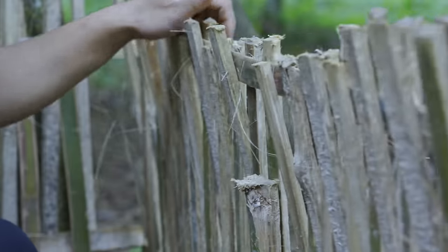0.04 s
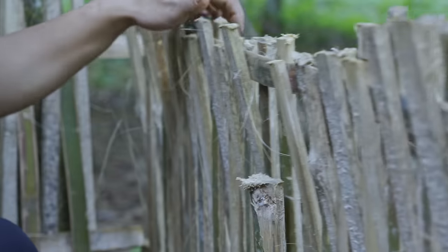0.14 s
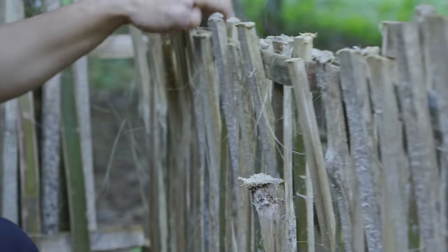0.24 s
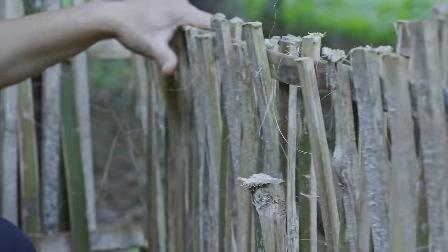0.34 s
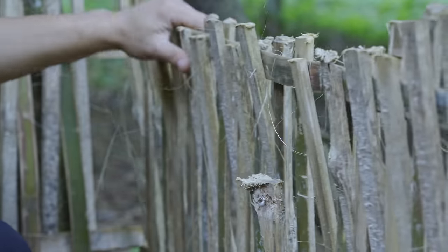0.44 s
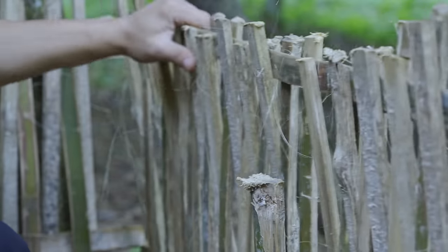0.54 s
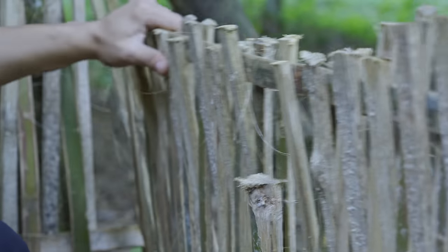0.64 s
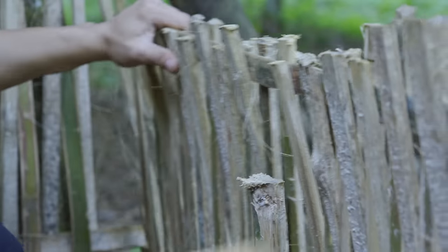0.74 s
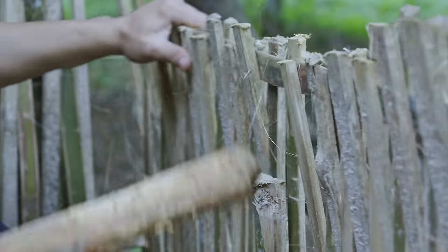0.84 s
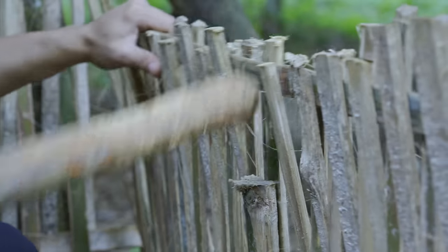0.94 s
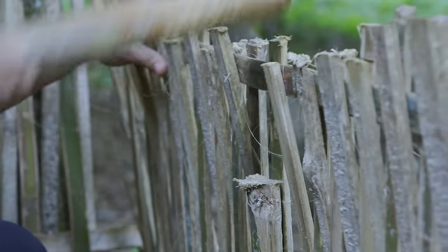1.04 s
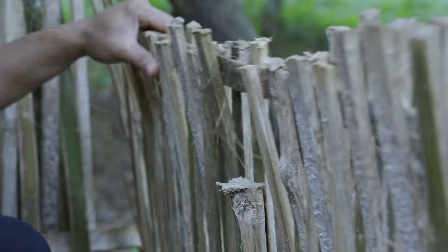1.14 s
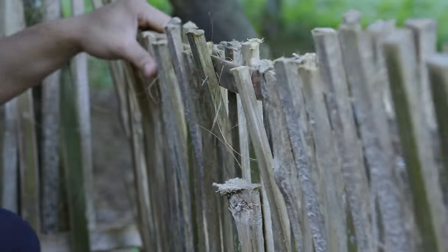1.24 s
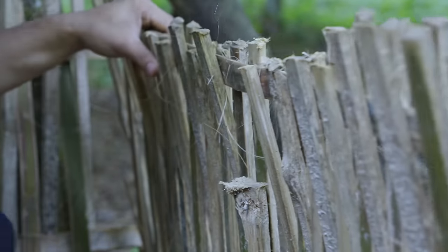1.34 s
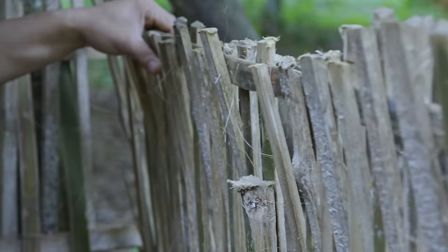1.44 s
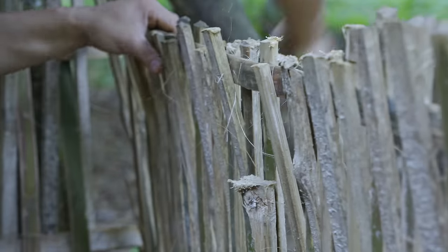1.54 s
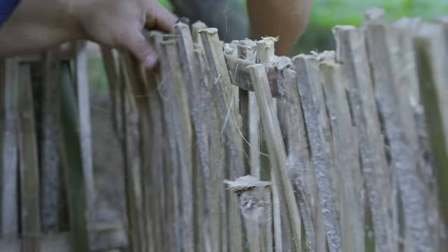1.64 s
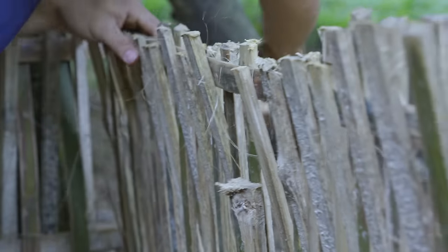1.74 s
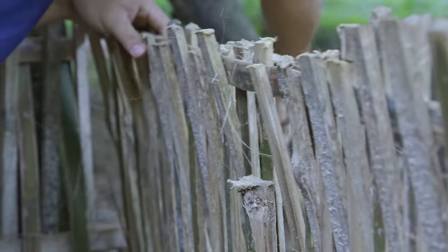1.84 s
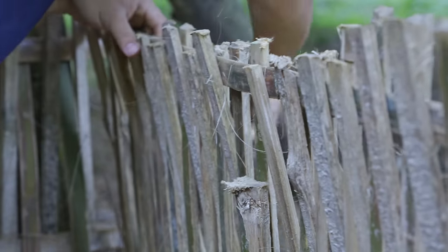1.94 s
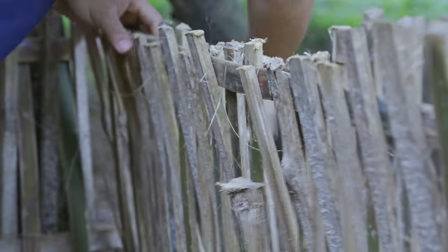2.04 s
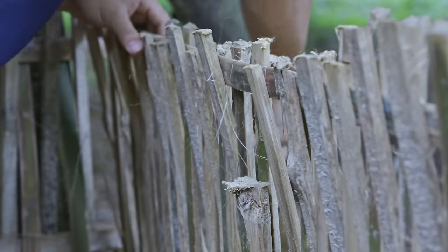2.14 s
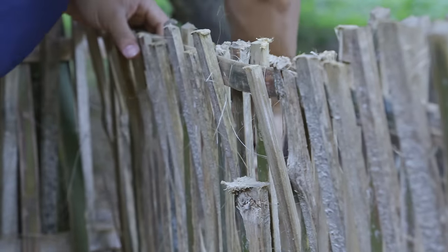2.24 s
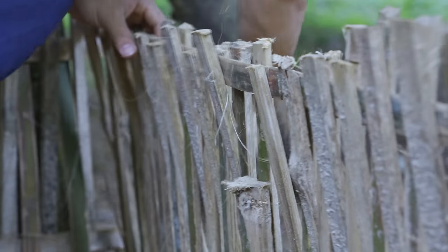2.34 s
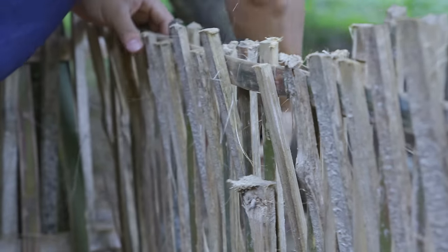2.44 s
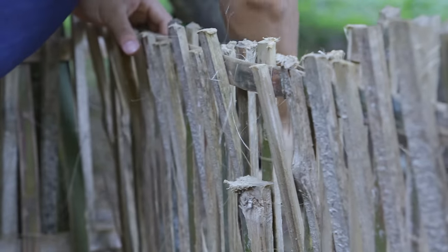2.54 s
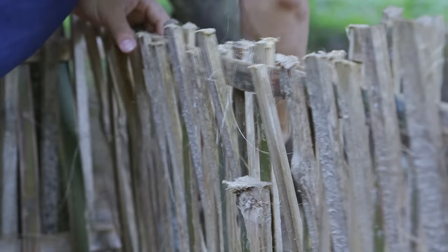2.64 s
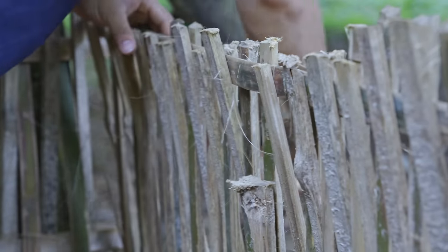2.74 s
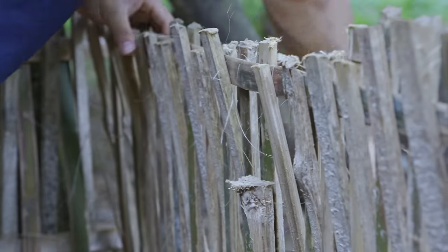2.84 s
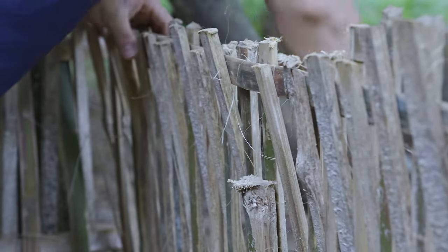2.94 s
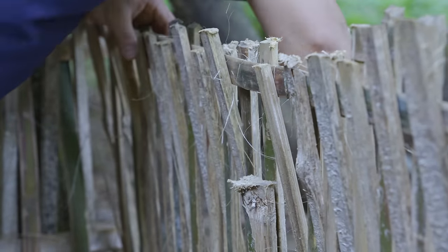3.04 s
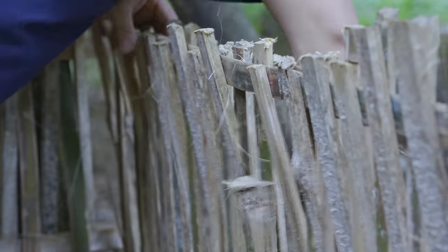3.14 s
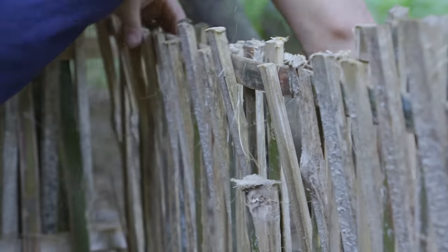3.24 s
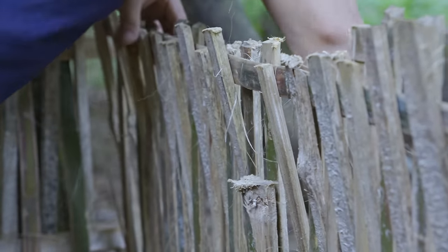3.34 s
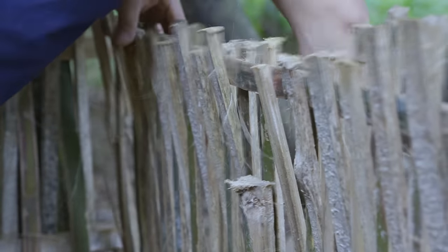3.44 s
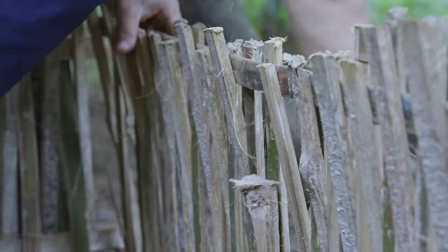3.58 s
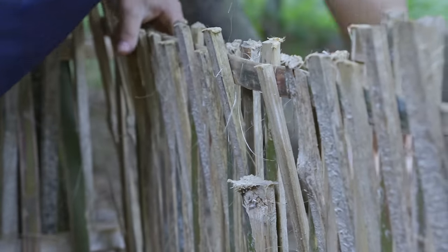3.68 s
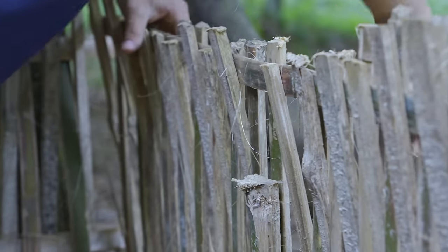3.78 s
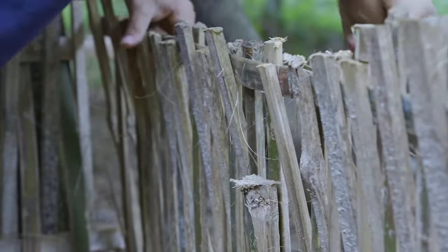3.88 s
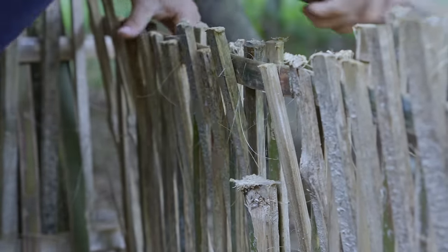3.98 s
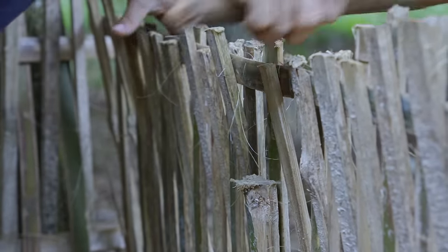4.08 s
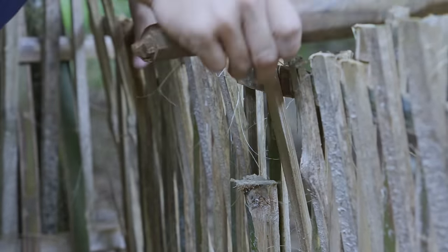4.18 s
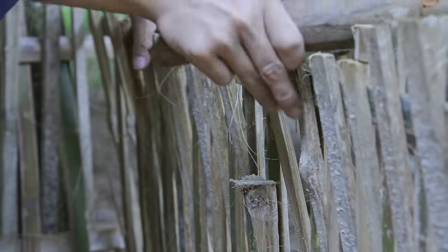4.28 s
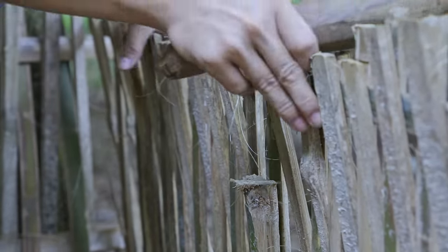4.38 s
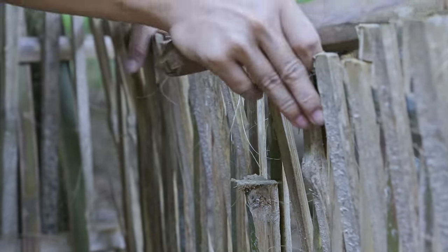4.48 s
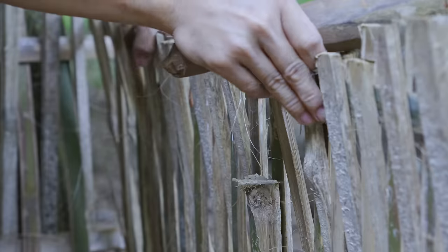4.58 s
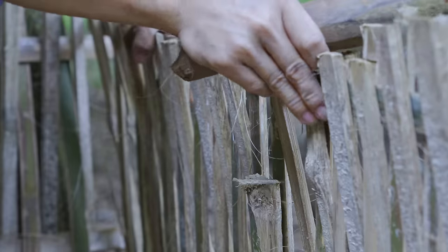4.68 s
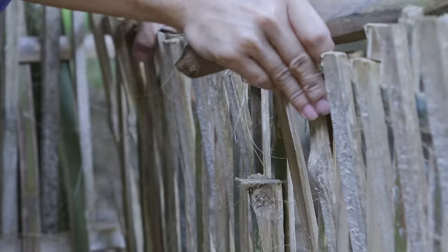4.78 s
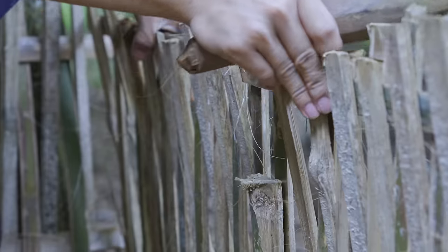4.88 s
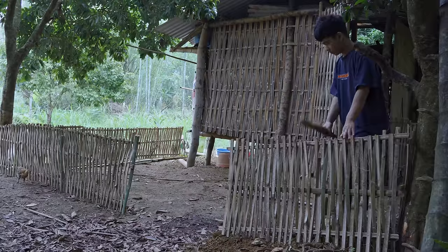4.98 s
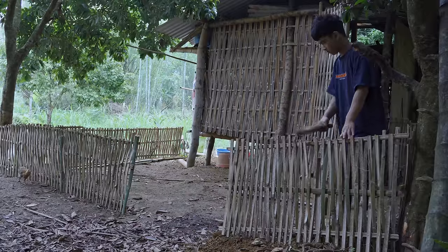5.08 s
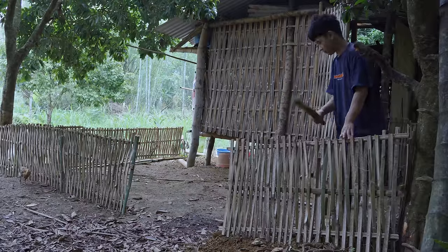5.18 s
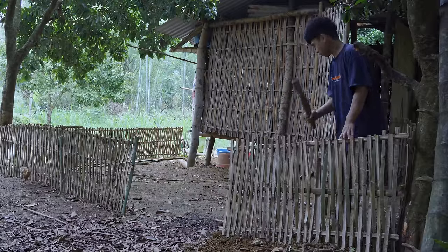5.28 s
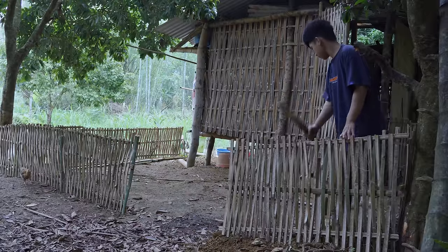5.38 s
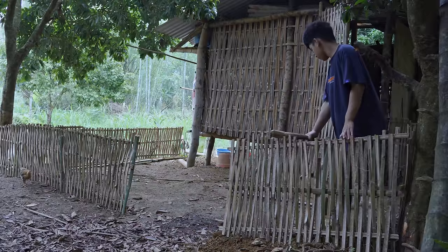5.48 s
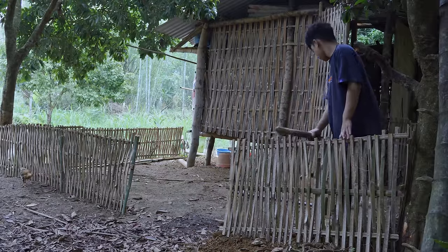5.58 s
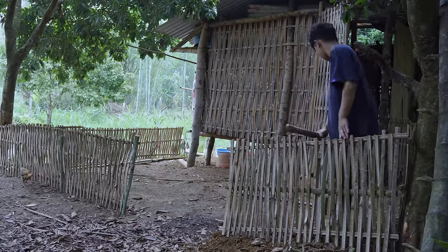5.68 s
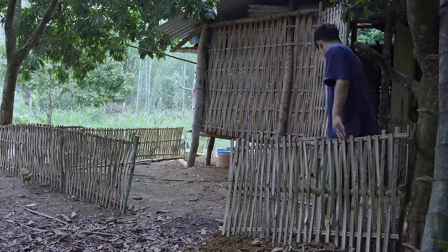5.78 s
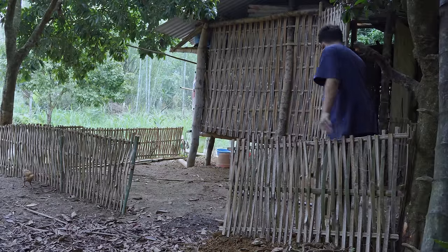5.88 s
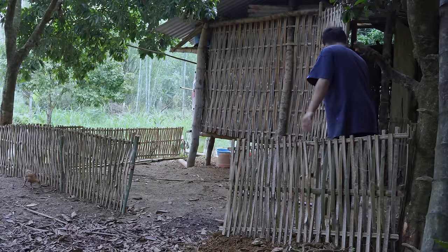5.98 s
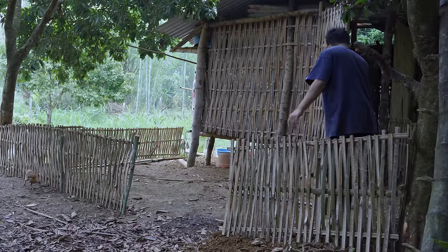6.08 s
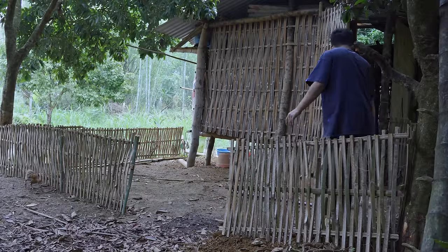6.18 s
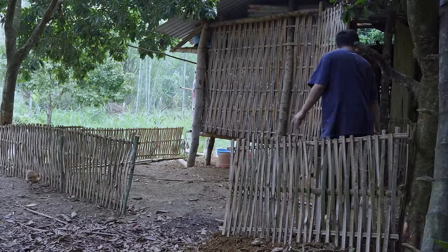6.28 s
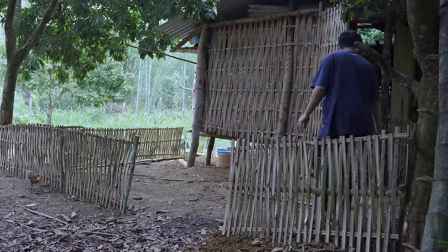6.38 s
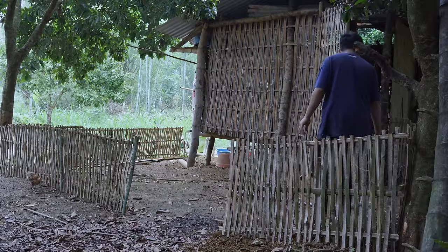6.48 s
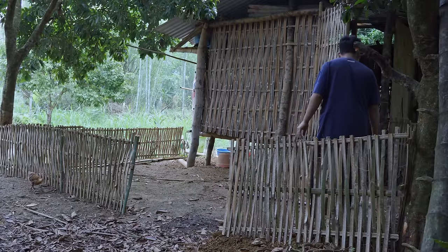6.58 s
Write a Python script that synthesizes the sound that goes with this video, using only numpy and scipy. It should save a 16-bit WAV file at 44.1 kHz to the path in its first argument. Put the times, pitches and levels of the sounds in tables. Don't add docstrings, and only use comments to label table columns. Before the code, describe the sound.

Close by, fingers tick against dry bamboo stakes, then a wooden club bumps the fence hollowly. Six hard cracking blows follow about a third to half a second apart, with loose stakes rattling and the club bouncing. A pause brings a hen cluck, finger flicks and snapping fibres. The microphone then moves back for two last blows. Insects hiss steadily throughout the open yard, with faint leaf rustle.

```python
import sys
import numpy as np
from scipy import signal
from scipy.fft import rfft, irfft, next_fast_len
from scipy.io import wavfile
from scipy.ndimage import uniform_filter1d, map_coordinates

SR = 44100
rng = np.random.default_rng(int(sys.argv[2]) if len(sys.argv) > 2 else 0)


def linear_from_db(decibels):
    return 10 ** (np.asarray(decibels, float) / 20)


def wav_record(signal):
    frames = np.transpose(np.atleast_2d(signal))
    bounded = np.clip(frames, -1, 1)
    quanta = np.round(bounded * 32767).astype(np.int16)
    wavfile.write(sys.argv[1], SR, quanta)


N = 291942
TIME = np.arange(N) / SR

# time in seconds, level in dB.
RUSTLE_DB = [(0.0, -56.5), (0.98, -52), (1.42, -55), (2.63, -57.5), (2.95, -59), (3.69, -59), (3.89, -60),
             (4.24, -60.5), (4.44, -57), (6.62, -56)]
# frequency in Hz, level in dB.
RUSTLE_COLOUR = [(25, 1.5), (70, 4), (140, 0.5), (300, -4.5), (600, -2.5), (900, -8), (1050, 1), (1300, -4),
                 (1700, -8.5), (4000, -8.5), (10000, -16), (16000, -23)]
# time in seconds, level in dB.
ENGINE_DB = [(0, -60.5), (1, -54), (1.5, -60.5), (2.4, -54), (2.9, -59), (3.6, -56), (4.5, -63.5),
             (5.7, -48.5), (6.62, -55)]
# frequency in Hz, likeness from 0 to 1.
LIKENESS = [(110, .995), (220, 0.76), (550, 0.3), (1650, 0.57), (4970, 0.21), (15000, 0.011)]
# time in seconds, level in dB.
CHORUS_DB = [(0, -49), (.5, -48.5), (1.5, -48.5), (2.6, -48.5), (3.1, -52), (3.8, -52.5), (4.8, -50),
             (5.7, -49.5), (6.62, -49.5)]
# frequency in Hz, level in dB.
CHORUS_COLOUR = [(1850, -18), (2050, 0.5), (2300, -9.5), (2700, 1.5), (3200, 1), (3600, -3), (4100, -4.5),
                 (4800, 1.5), (5150, -4.5), (5400, -10.5), (6200, -32)]
# time in seconds, body pitch in Hz, level in dB.
FIRST_CICADA = [(0, 8060, -57.5), (.5, 7900, -55), (1, 7730, -56), (1.6, 7560, -56), (2.3, 7200, -58.5),
                (3, 7170, -59), (3.3, 7150, -56)]
# time in seconds, body pitch in Hz, level in dB.
SECOND_CICADA = [(3.2, 8700, -65), (3.6, 9000, -68), (4.1, 9100, -63.5), (4.5, 9060, -63.5),
                 (4.98, 9000, -63.5)]
# seconds into phrase, body pitch in Hz, level in dB.
PHRASE_ROWS = [(.0, 4780, -47), (.2, 4950, -47), (.4, 4910, -46), (.545, 5000, -46.5), (.585, 4420, -51),
               (.65, 4320, -52), (.7, 4330, -42)]
# time in seconds, body pitch in Hz, level in dB.
FOURTH_CICADA = [(4.98, 8850, -58.5), (6.62, 8600, -58)]
# start in seconds, peak in dB, ring in Hz, crack in dB.
FLICKS = [(0.1344, -38, 2820, -9), (0.318, -39, 3280, 6), (0.5528, -24.5, 4550, -0.5),
          (0.5618, -41, 4770, -10), (0.5815, -29, 3550, 0.5), (0.5961, -34, 4170, -3),
          (0.6155, -46, 4640, -11), (4.135, -41, 2490, 8), (4.277, -30.5, 2370, -15),
          (4.3994, -36, 4680, -10), (4.4194, -35, 2020, -11), (4.4777, -31, 4000, 6),
          (4.5241, -33, 2410, -8), (4.5474, -32, 3070, -5), (4.6319, -38, 2870, 7.5)]
# start in seconds, pitch in Hz, level in dB.
FIBRE_SNAPS = [
    (.1352, 13500, -46),
    (4.136, 12600, -41),
    (4.4, 12500, -47),
    (4.4785, 12500, -29),
    (4.633, 13000, -41.5),
]
# start in seconds, clatter in dB, hold in seconds, brightness in dB per octave.
HAND_BRUSHES = [
    (0.542, -40.5, 0.05, -2.5),
    (0.991, -37, 0.031, -5.5),
    (4.272, -46.5, 0.036, -4.5),
    (4.388, -56, 0.18, 10),
    (4.6, -55, .04, 7),
    (4.966, -49, .01, -2),
]
# start in seconds,
# pitch in Hz, level in dB, t60 in seconds.
FENCE_NOTES = [(.29, 750, -43.5, 0.036), (0.651, 417, -48.5, 0.2), (0.729, 440, -40, 0.096),
               (0.961, 490, -36, 0.11), (.986, 568, -30.5, 0.085), (1.008, 400, -32.5, 0.092),
               (1.022, 240, -48, 0.12), (1.048, 338, -34, 0.087), (1.039, 127, -43, 0.23),
               (3.1405, 1480, -17.5, 0.02), (2.03, 2130, -23, 0.045), (2.07, 2230, -26, .04),
               (2.35, 1340, -27, 0.036), (3.476, 1050, -22, 0.024), (5.096, 1036, -35, 0.039),
               (0.725, 1590, -33, .025), (0.982, 2030, -31, 0.028), (1.063, 1523, -28.5, 0.036),
               (3.551, 213, -32, 0.06), (2.0222, 3350, -6, 0.013), (5.492, 3260, -22.5, .03),
               (4.271, 333, -62, 0.085), (1.06, 465, -36, 0.11), (1.17, 590, -44, 0.079),
               (1.685, 1696, -10, 0.022), (1.686, 2750, -11, 0.026), (2.023, 1505, -18.5, 0.05),
               (2.024, 3400, -21, 0.021), (2.216, 1770, -25, 0.015), (2.351, 2990, -14, 0.027),
               (2.503, 1730, -29, 0.024), (2.543, 1670, -30.5, 0.029), (2.669, 1550, -10.5, 0.031),
               (2.698, 1490, -25, 0.035), (3.144, 2680, -25, 0.033), (3.142, 5070, -9.5, 0.026),
               (3.237, 1820, -24, 0.027), (3.475, 171, -18, 0.021), (3.557, 1590, -20, 0.028),
               (3.574, 1650, -26, 0.023), (3.629, 1600, -30.5, 0.015), (5.096, 120, -34, 0.065),
               (5.095, 8930, -9, 0.0083), (5.098, 440, -40, 0.17), (5.111, 2725, -27, 0.076),
               (5.49, 1084, -16, 0.023), (5.515, 685, -30, 0.14), (5.524, 1495, -28.5, 0.073),
               (1.72, 97, -46, .2), (2.03, 90.5, -51, .2), (2.066, 327, -36, 0.03),
               (2.113, 790, -46, 0.032), (2.36, 110, -46, 0.29), (1.686, 1050, -24, .03),
               (1.687, 620, -38, 0.032), (2.669, 973, -28, 0.023), (2.76, 231, -40, 0.11),
               (2.704, 517, -30, 0.044), (2.732, 464, -37, .05), (3.477, 95, -36, .2),
               (3.556, 556, -30.5, 0.053)]
# start in seconds, peak in dB, ring in Hz, crack in dB.
CLUB_BUMPS = [(0.703, -22, 1895, -31), (0.7243, -21.5, 1840, -24), (0.7376, -19.5, 2000, -31),
              (0.7988, -34.5, 2840, -14), (0.9609, -18, 2080, -16), (0.982, -20, 1890, -23),
              (1.0233, -25, 2620, 0), (1.033, -42, 2420, 1), (1.0483, -24, 1830, -9),
              (1.0614, -23.5, 1456, -17), (1.0875, -33, 2400, -20), (1.397, -34, 1740, -20)]
# start in seconds, peak in dB, ring in Hz, crack in dB, clatter in dB.
NEAR_BLOWS = [
    (1.6845, -8.5, 2635, -9, -21.5),
    (2.0216, -5, 3474, -16, -20),
    (2.3491, -6.5, 2930, -12, -21),
    (2.6664, -12, 2100, -4.5, -25),
    (3.14, -5.5, 2560, -11, -21),
    (3.4748, -10, 2390, -4, -23),
]
# start in seconds, peak in dB, ring in Hz, crack in dB, clatter in dB.
FAR_BLOWS = [
    (5.0945, -14, 2930, 0, -34.5),
    (5.4904, -4.5, 2560, -7.5, -25),
]
# start in seconds, peak in dB, ring in Hz, crack in dB.
STAKE_KNOCKS = [(1.7096, -15, 4000, -23), (1.7357, -16, 4330, -21), (1.7801, -20, 4380, -16),
                (2.0358, -16, 3300, -3), (2.0629, -17, 4580, -14), (2.0821, -26, 3440, 7),
                (2.3622, -11, 2420, 1.5), (2.387, -16, 2280, -4), (2.679, -8.5, 3300, -4),
                (2.699, -10.5, 2230, -18), (2.7035, -9, 3150, -18), (2.706, -17, 2080, -18),
                (3.1762, -18, 3360, -14), (3.192, -12.5, 3580, -4), (3.4785, -9.5, 4490, -18),
                (3.4845, -12, 2760, -9), (3.4938, -14, 4200, -21), (3.5152, -9.5, 3640, -11),
                (3.5237, -10.5, 4420, -13), (5.4985, -14.5, 2980, -3), (5.5093, -14, 3940, -3),
                (5.5344, -27, 1470, -5)]
# start in seconds, first mode in Hz, second mode in Hz, level in dB.
STAKE_PAIRS = [(1.706, 4380, 2580, -12), (1.722, 3876, 2040, -23), (1.729, 3920, 3140, -16),
               (1.798, 3144, 3900, -30), (1.806, 2800, 3510, -31), (2.0335, 8400, 4931, -16),
               (2.0615, 4500, 5800, -30), (2.082, 3381, 2347, -17), (2.096, 3350, 2320, -23),
               (2.106, 5500, 3820, -25), (2.361, 5490, 8000, -13.5), (2.374, 3720, 2239, -13),
               (2.388, 2300, 3550, -17), (2.404, 2450, 5103, -18), (2.4175, 3450, 6600, -21),
               (2.427, 3300, 4400, -24), (2.444, 4300, 3240, -21), (2.4535, 4307, 7149, -30),
               (2.668, 3150, 1500, -11.5), (2.6778, 5250, 3750, -14.5), (2.727, 3500, 4414, -22),
               (2.7452, 2326, 3970, -24), (2.765, 2713, 5620, -34), (3.167, 3300, 3900, -20),
               (3.177, 3280, 4600, -15), (3.1898, 4580, 7000, -14.5), (3.207, 4300, 4900, -18),
               (3.213, 3300, 4700, -24), (3.228, 3252, 3870, -24), (3.2785, 4400, 3440, -32),
               (3.48, 4500, 5900, -17), (3.484, 2870, 5460, -16), (3.496, 4307, 3200, -23),
               (3.5155, 3359, 5300, -14), (3.524, 4500, 3300, -14), (3.5435, 4120, 3130, -35),
               (3.566, 4700, 1950, -14.5), (5.0955, 6000, 4200, -19), (5.11, 2940, 4450, -25),
               (5.113, 3720, 2770, -20), (5.136, 9130, 4140, -29), (5.521, 1572, 2713, -29),
               (5.532, 2600, 3260, -25)]
# start in seconds, peak in dB, ring in Hz, crack in dB.
CLUB_REBOUNDS = [
    (2.2154, -24, 1915, -13),
    (2.5, -23.5, 1880, -21),
    (2.5425, -24, 1815, -22),
    (2.8787, -29.5, 1780, -20),
    (3.2363, -15.5, 1950, -11),
    (3.2532, -16.5, 1705, -21),
    (3.5555, -11, 1840, -14),
    (3.5727, -8, 1860, -13),
    (3.6131, -21, 1950, -24),
    (3.63, -28, 1580, -23),
]
CLUB_MODE_DB = [-7, -5]
# frequency in Hz, level in dB per Hz.
STAKE_COLOUR = [(53, -38), (90, 7), (205, 2), (429, -12.5), (620, -4), (1070, -15.5), (1240, -11),
                (4260, 3), (7490, 1), (14400, -19), (16000, -21)]
# frequency in Hz, level in dB, t60 in seconds.
HOLLOW_MODES = [(114, -16, 0.051), (216, -5.5, 0.031), (435, -3.5, 0.069), (672, 4, 0.02), (808, -3, 0.028)]
# frequency in Hz, level in dB.
SWAY_COLOUR = [(90, -23), (130, -1), (230, 3), (450, 6), (800, -12), (1300, -14)]
# start in seconds, length in seconds, pitch in Hz, level in dB.
HEN_CLUCKS = [
    (3.826, 0.037, 573, -43),
    (4.435, 0.029, 517, -54),
    (4.4, 0.17, 523, -61),
    (4.53, .06, 490, -65),
    (4.6, 0.068, 508, -56),
    (4.68, 0.034, 521, -57),
    (5.02, .015, 890, -57.5),
    (5.08, 0.033, 835, -39.5),
]
# start in seconds, length in seconds, pitch in Hz, level in dB.
CHICK_PEEPS = [
    (5.195, 0.022, 5420, -42),
    (5.79, 0.094, 4010, -55),
    (6.325, 0.065, 4100, -50),
    (6.57, 0.065, 3980, -57),
]

SCENE_CHANGE_S = 4.985
SETTLE_S, FAR_SETTLE_S, BRUSH_SETTLE_S = 0.39, 0.35, 0.47
THIRD_HEARD_S = 4.992
PHRASE_FROM_S, PHRASE_S = 4.965, .717
CHIRP_FROM_S, CHIRP_S, STOP_DB = .032, .0635, 11
ACCENT_DB, ACCENT_S = 4, .018
TOP_HZ, EDGE_HZ, EDGE_DB = 16830, 15780, -26


def unit(x):
    return x / np.sqrt(np.mean(x ** 2) + 1e-20)


def along(points, hz):
    f, v = np.transpose(points)
    return np.interp(np.log(hz + 1), np.log(f + 1), v)


def curves(rows, t=TIME):
    s, *cols = np.transpose(rows)
    return [np.interp(t, s, c) for c in cols]


def wobble(rate_hz):
    return map_coordinates(rng.standard_normal(int(N * rate_hz / SR) + 4), [TIME * rate_hz])


def rush(spectrum, patchy_db, alike=LIKENESS):
    z = signal.stft(rng.standard_normal((2, N + 4096)), nperseg=512)[2]
    field = uniform_filter1d(rng.standard_normal(z.shape[1:]), size=5, axis=0)
    field = uniform_filter1d(field, size=12, axis=1)
    hz = np.linspace(0, SR / 2, z.shape[1])
    turn = np.arccos(np.clip(along(alike, hz), -1, 1))[:, None] / 2
    z = z * linear_from_db(patchy_db * unit(field) + along(spectrum, hz)[:, None])
    mid, side = z[0] * np.cos(turn), z[1] * np.sin(turn)
    return unit(signal.istft(np.array([mid + side, mid - side]), nperseg=512)[1][:, :N])


def rings(start_s, hz, t60_s, db, pan_db=0., lag_s=0., rise_s=1e-4, size=256):
    out = np.zeros((2, N + size))
    columns = np.broadcast_arrays(start_s, hz, t60_s, db, pan_db, lag_s)
    start_s, hz, t60_s, db, pan_db, lag_s = (v[:, None] for v in columns)
    for channel, side in zip(out, (.5, -.5)):
        at = (start_s + side * lag_s) * SR
        first = np.clip(np.ceil(at).astype(int), 0, N)
        t = ((np.ceil(at) - at + np.arange(size)) / SR).astype(np.float32)
        swing = np.exp(-t * np.float32(np.log(1000) / t60_s)) * (1 - np.exp(-t / np.float32(rise_s)))
        wave = linear_from_db(db + side * pan_db) * swing * np.sin(t * np.float32(2 * np.pi * hz))
        heard = np.bincount((first - first.min() + np.arange(size)).ravel(), wave.ravel())
        channel[first.min():][:len(heard)] = heard
    return out[:, :N]


def leaves(x, wet_db, t60_s):
    t = np.arange(SR // 4) / SR
    same, apart = rng.standard_normal((2, len(t))) * linear_from_db(-60 * t / t60_s) * (t > .002)
    apart = signal.sosfilt(signal.butter(2, 1500, "high", fs=SR, output="sos"), apart)
    tail = np.array([same + apart, same - apart])
    tail = tail / np.linalg.norm(tail[0])
    return x + linear_from_db(wet_db) * signal.fftconvolve(x * np.ones((2, 1)), tail, axes=1)[:, :N]


def rustle():
    return linear_from_db(4 + curves(RUSTLE_DB)[0] + 1.1 * wobble(4.62)) * rush(RUSTLE_COLOUR, patchy_db=2.0)


def engine():
    low, high = [linear_from_db(4 * wobble(24) - 2) * np.sin(2 * np.pi * hz * TIME + 2 * wobble(16)) for hz in (42, 85)]
    return linear_from_db(curves(ENGINE_DB)[0] - 2.5) * (low + linear_from_db(-0.5) * high)


def far_chorus():
    level_db = curves(CHORUS_DB)[0] + 1.5 + 0.15 * wobble(4.2) + 0.26 * wobble(30)
    return linear_from_db(level_db) * rush([(1500, -59)] + CHORUS_COLOUR + [(7500, -54)], patchy_db=-0.5)


def whistler():
    return linear_from_db(-61.0 + 2.6 * wobble(4.6)) * np.sin(2 * np.pi * 2480 * TIME + .5 * wobble(21))


def cicada(rows, rate_hz, jitter, spread, t60_s, pan_db, wet_db, chirp_db=0 * TIME, roam=0):
    start = np.arange(rows[0][0], min(rows[-1][0], N / SR), 1 / rate_hz)
    u = rng.standard_normal((len(start), 3))
    start = start + jitter / rate_hz * u[:, 0]
    level_db = np.interp(start, TIME, chirp_db) + 0.5 * u[:, 2] * min(1, 9 * jitter)
    drift = roam * map_coordinates(rng.standard_normal(256), [start * 30])
    scatter = spread * (u[:, 1] + 0.16 * u[:, 1] ** 2 - .35)
    hz = curves(rows, start)[0] * (1 + drift + scatter)
    clicks = rings(start, hz, t60_s, level_db, rise_s=0.00025)[0]
    share = np.sqrt(len(start) / rate_hz * SR / N)
    song = unit(clicks) * share * linear_from_db(curves(rows)[1])
    return leaves(song, wet_db, .04) * linear_from_db([[pan_db / 2], [-pan_db / 2]])


def outer_cicadas():
    song = cicada(FIRST_CICADA, 420, .45, 0.045, 0.004, 4, -1)
    return song + cicada(FOURTH_CICADA, 400, .45, 0.05, 0.004, 0.73, -1)


def second_cicada():
    upper = [(s, 1.06 * hz, db - 7) for s, hz, db in SECOND_CICADA]
    song = cicada(SECOND_CICADA, 97.3, .012, .02, .0028, .8, 6, roam=.025)
    return song + cicada(upper, 97.3, 0.032, 0.017, 0.0028, 1, 10, roam=0.026)


def phrases():
    rows = [(PHRASE_FROM_S + k * PHRASE_S + s, hz, db) for k in range(3) for s, hz, db in PHRASE_ROWS]
    into = (TIME - PHRASE_FROM_S) % PHRASE_S - CHIRP_FROM_S
    nearest = np.clip(np.round(into / CHIRP_S), 0, 6) * CHIRP_S
    accent = np.exp(-(into % CHIRP_S) / ACCENT_S) * (into < 7 * CHIRP_S) - .3
    stop = np.exp(-((into - nearest) / np.where(into > nearest, .003, .008)) ** 2)
    return rows, ACCENT_DB * accent - STOP_DB * stop


def third_cicada():
    body, chirp_db = phrases()
    overtone = [(s, 2 * hz, db - 24 + (5000 - hz) / 80) for s, hz, db in body]
    shoulder = [(s, 1.097 * hz, db - 10) for s, hz, db in body]
    song = cicada(body, 345, .15, .014, .009, 8, -8, chirp_db)
    song += cicada(overtone, 300, 0.25, 0.018, 0.0098, 2.7, -1.3, chirp_db)
    song += cicada(shoulder, 345, .2, .03, .005, 7, -5, chirp_db)
    return song * np.clip((TIME - THIRD_HEARD_S) / .01, 0, 1)


def flat(*columns):
    return [c.ravel() for c in np.broadcast_arrays(*columns)]


def knocks(rows, t60_s):
    s, db, hz, thud_db, crack_db, pan_db = np.transpose(rows)[:, :, None]
    s = s + 0.000783
    u = rng.uniform(size=(len(rows), 4, 40)).transpose(1, 0, 2)

    octaves = np.linspace(-1.3, 1.3, num=15) + 0.13 * (u[1, :, :15] - .5)
    ring_db = db - 8 - 7 * abs(octaves) + 0.2 * octaves - 7 * np.minimum(octaves, 0) ** 2 - 6 * u[3, :, :15]
    ring_s = t60_s * (0.77 + 1.44 * u[2, :, :15]) * 2 ** (-.3 * octaves)
    ring = rings(*flat(s + 0.000648 * u[0, :, :15], hz * 2 ** octaves, ring_s, ring_db, pan_db), size=1024)

    snap = rings(*flat(s + 0.00054, 0.25 * hz, 0.00049, db + 7.5, pan_db), rise_s=3e-5, size=128)

    mode_hz, low_db, low_s = np.transpose(HOLLOW_MODES)
    mode_hz = mode_hz * (0.924 + 0.19 * u[1, :, 15:20])
    low_db = db + thud_db + low_db + 4.5 - 6 * u[2, :, 15:20]
    thud = rings(*flat(s + 0.00437 * u[0, :, 15:20], mode_hz, low_s, low_db), rise_s=0.0026, size=3072)

    crack_db = db + crack_db - 7 * u[1] - 11 * u[0]
    crack_pan_db, lag_s = pan_db + 5 * (u[2] - .5), .00006 * (u[3] - .5)
    crack_hz = 5200 * 2.84 ** u[1]
    crack = rings(*flat(s + .006 * u[0] ** 3, crack_hz, 0.0026, crack_db, crack_pan_db, lag_s), size=128)
    return ring + snap + thud + crack


def contacts(rows, t60_s, thud_db, grows, left_db, scatter_db):
    s, db, hz, crack_db = np.transpose(rows)[:4]
    thud = thud_db - (1 - grows) * (db + 15)
    pan_db = left_db + scatter_db * rng.standard_normal(len(s))
    return knocks(np.transpose([s, db, hz, thud, crack_db, pan_db]), t60_s)


def clatter(s, db, hold_s, t60_s, tilt_db, count=4000):
    u = rng.uniform(size=(count, 6))
    t = .002 + .3 * u[:, 0] ** 1.2
    clump_db = 1.6 * rng.standard_normal(128)[np.minimum(t / .004, 127).astype(int)]
    hz = 100 * 160 ** (u[:, 1] ** .5)
    lull_db = 5 * np.exp(-((t - .019) / .006) ** 2)
    fade_db = -60 * np.maximum(t - np.clip(hold_s, 0, .2), 0) / t60_s * (hz / 4000) ** 0.12 - 3.5 - lull_db
    size_db = along(STAKE_COLOUR, hz) + (2.5 + tilt_db) * np.log2(hz / 4000) + 8 * (u[:, 2] - .5)
    treble = np.minimum(hz / 5000, 1)
    pan_db = 13 * (u[:, 3] - .5) * treble + 2 * treble
    level_db = db + fade_db + size_db + clump_db * np.minimum(hz / 2000, 1)
    ring_s = np.minimum(12 / hz + 0.0025, .007)
    return rings(s + t, hz, ring_s, level_db, pan_db, 0.0001 * (u[:, 4] - .5), size=192)


def hand():
    wood = contacts(FLICKS, 0.023, thud_db=-22.0, grows=0.79, left_db=0.0, scatter_db=6.0)
    for s, db, hold_s, tilt_db in HAND_BRUSHES:
        wood += clatter(s, db, hold_s, BRUSH_SETTLE_S, tilt_db, count=1200)
    return wood


def fibre_snaps():
    s, hz, db = np.repeat(FIBRE_SNAPS, 8, axis=0).T
    u = rng.standard_normal((len(s), 3))
    hz = np.minimum(hz * (1 + 0.24 * u[:, 1]), 15500)
    return rings(s + 0.00077 * abs(u[:, 0]), hz, 0.0071, db - 2, 3 * u[:, 2])


def hollow_stakes_and_posts():
    s, hz, db, t60_s = np.transpose(FENCE_NOTES)
    return rings(s, hz, t60_s, db, rise_s=0.00031, size=6144)


def club():
    wood = contacts(CLUB_BUMPS, 0.024, thud_db=-15.0, grows=0.42, left_db=-1.5, scatter_db=0.0)
    bounces = np.multiply(CLUB_REBOUNDS, [1, 0.86, 1.3, 0.9])
    wood += contacts(bounces, 0.014, thud_db=-19.5, grows=1.0, left_db=0.0, scatter_db=0.5)
    s, db = np.transpose(CLUB_BUMPS + CLUB_REBOUNDS)[:2]
    wood += rings(s + 0.00101, 2200, 0.0004, db - 11.5, rise_s=5e-5, size=128)
    s, db, hz = np.transpose(CLUB_REBOUNDS)[:3]
    for ratio, level_db in zip((1, 1.7), CLUB_MODE_DB):
        wood += rings(s + 0.000927, ratio * hz, 0.023, db + level_db, rise_s=0.00035, size=1536)
    return wood


def smacks():
    hits = NEAR_BLOWS + FAR_BLOWS + CLUB_BUMPS + CLUB_REBOUNDS
    s, db = np.transpose([row[:2] for row in hits])
    return rings(s + 0.001075, 3300, 0.00068, db + 2.5, rise_s=5e-5, size=128)


def blows():
    wood = contacts(NEAR_BLOWS, 0.019, thud_db=-25.0, grows=0.33, left_db=0.0, scatter_db=1.5)
    wood += contacts(FAR_BLOWS, 0.0084, thud_db=-16.0, grows=0.63, left_db=-0.5, scatter_db=0.5)
    wood += sum(clatter(row[0], row[-1], 0.044, SETTLE_S, -0.25) for row in NEAR_BLOWS)
    wood += sum(clatter(row[0], row[-1], 0.0049, FAR_SETTLE_S, 1) for row in FAR_BLOWS)
    return wood


def crush():
    swell = np.zeros(N)
    for s, db, *_, clatter_db in NEAR_BLOWS + FAR_BLOWS:
        part = slice(round(s * SR), round(s * SR) + 16384)
        t = np.maximum(TIME[part] - s - .0008, 0)
        wash = linear_from_db(clatter_db - 60 * t / SETTLE_S) * (1 - np.exp(-t / 0.016))
        burst = linear_from_db(db - 11 - 60 * t / 0.046) * (1 - np.exp(-t / 0.00069))
        swell[part] += wash + burst
    colour = [(300, -25), (900, -7), (1600, -3), (3000, -1), (7000, -4), (16000, -24)]
    return swell * rush(colour, patchy_db=5.5, alike=[(500, .97), (4000, .6), (12000, 0.7)])


def sway(count=90):
    s, db = np.transpose([(row[0], row[-1]) for row in NEAR_BLOWS + FAR_BLOWS])[:, :, None]
    u = rng.uniform(size=(len(s), 3, count)).transpose(1, 0, 2)
    t, hz = .3 * u[0], 90 * 14 ** u[1]
    swing_db = -60 * t / 0.99 - 12 * np.exp(-t / 0.036)
    level_db = db - 20.5 + along(SWAY_COLOUR, hz) + swing_db + 10 * (u[2] - .5)
    return rings(*flat(s + t, hz, 12 / hz, level_db), rise_s=0.002, size=2048)


def stake_knocks():
    wood = contacts(STAKE_KNOCKS, 0.019, thud_db=-17.5, grows=0.25, left_db=-1.0, scatter_db=2.0)
    s, mode_hz, other_hz, db = np.transpose(STAKE_PAIRS)
    pan_db = 7.9 * rng.standard_normal(len(s))
    wood += rings(s, mode_hz, 0.017, db, pan_db, rise_s=0.00041, size=1024)
    return wood + rings(s, other_hz, 0.017, db - 3, pan_db, rise_s=0.00051, size=1024)


def no_deep_bass(wood):
    return signal.sosfilt(signal.butter(3, 100, "high", fs=SR, output="sos"), wood)


def birds(calls, overtones_db, droop, rough, doubling):
    out = np.zeros(N + SR)
    for s, length_s, hz, db in calls:
        u = np.arange(int(length_s * SR)) / (length_s * SR)
        phase = 2 * np.pi * hz * length_s * (u + droop * u * (1 - u))
        voice = sum(linear_from_db(level_db) * np.sin((k + 1) * phase) for k, level_db in enumerate(overtones_db))
        hoarse = 1 + doubling * np.cos(phase / 2)
        out[round(s * SR):][:len(u)] += linear_from_db(db) * np.sin(np.pi * u) ** 0.19 * voice * hoarse
    return leaves(out[:N] * (1 + rough * wobble(160)), -0.78, 0.15)


def scene():
    yard = rustle() + engine() + far_chorus() + whistler()
    cicadas = outer_cicadas() + second_cicada() + third_cicada()
    stakes = no_deep_bass(hand() + hollow_stakes_and_posts() + smacks() + blows() + stake_knocks())
    fence = leaves(stakes, wet_db=-5.5, t60_s=0.26) + fibre_snaps() + crush() + sway()
    near_club = leaves(no_deep_bass(club()), wet_db=-12, t60_s=0.14)
    hens = birds(HEN_CLUCKS, [0, -11, -22], 0.0447, 0.49, 0.28)
    chick = birds(CHICK_PEEPS, [0, -22], 0.013, 0.36, 0)
    return yard + cicadas + fence + near_club + hens + chick


def top_cut(x):
    return signal.sosfilt(signal.butter(12, 16830, fs=SR, output="sos"), x)


def record(dry):
    dip = linear_from_db(-13 * np.exp(-((TIME - SCENE_CHANGE_S) / 0.006) ** 2))
    size = next_fast_len(N)
    hz = np.fft.rfftfreq(size, 1 / SR)
    band = (hz < TOP_HZ) * linear_from_db(EDGE_DB * (hz > EDGE_HZ))
    mix = irfft(rfft(dry * dip, size) * band, size)[:, :N]
    return top_cut(mix)


dry = scene()
out = record(dry)
wav_record(out)
```